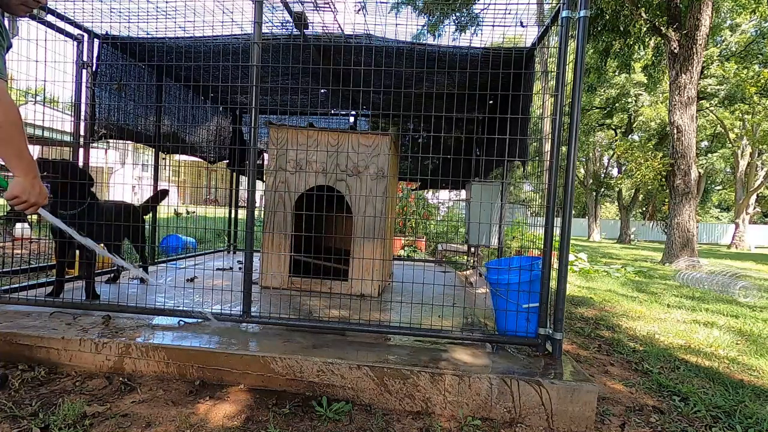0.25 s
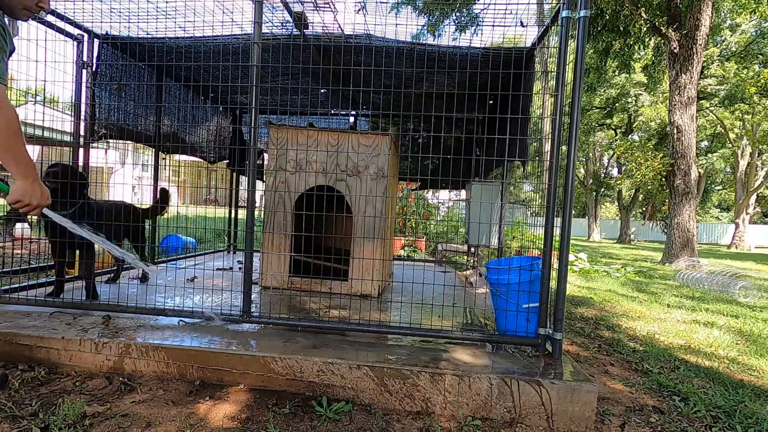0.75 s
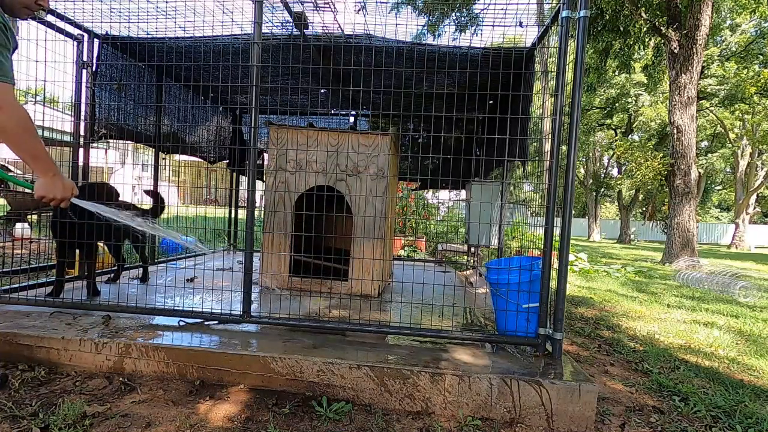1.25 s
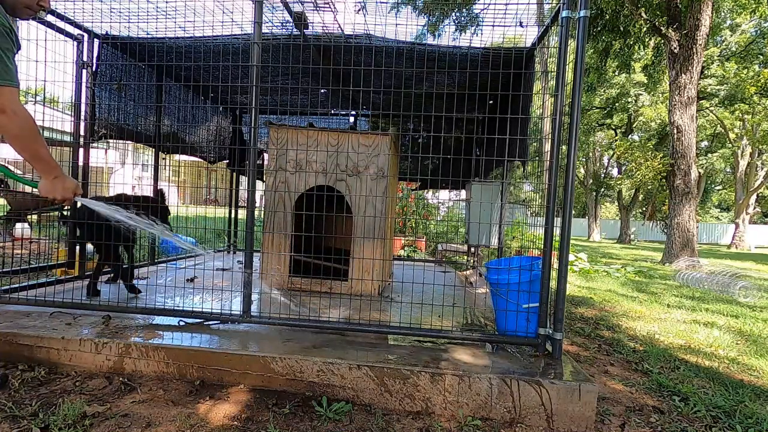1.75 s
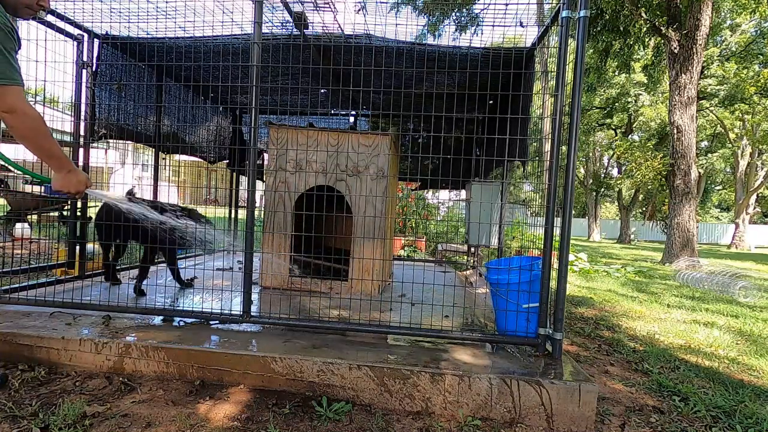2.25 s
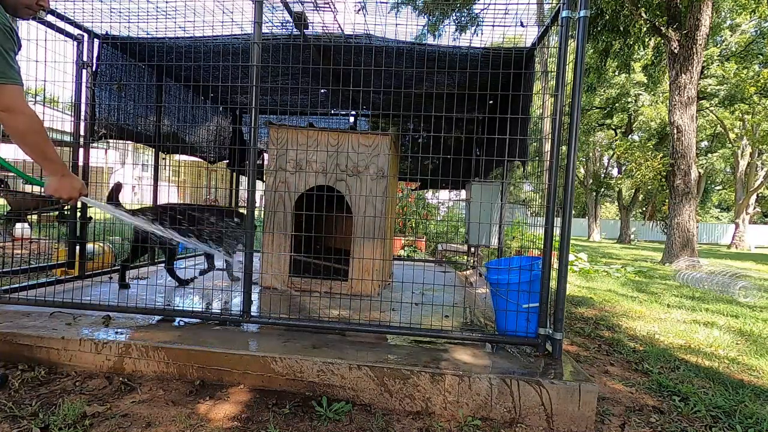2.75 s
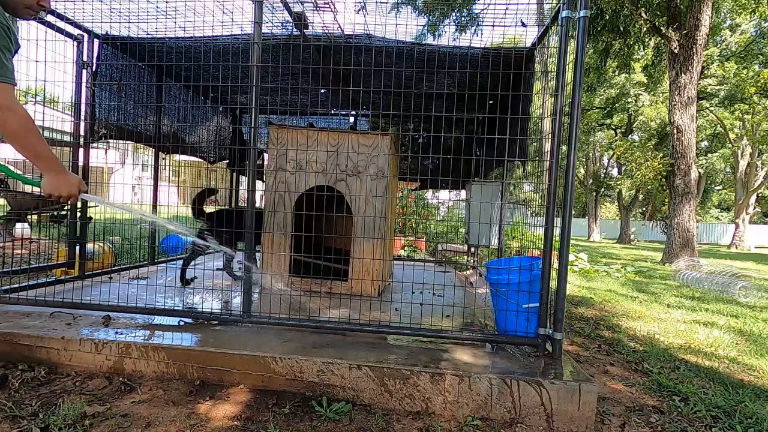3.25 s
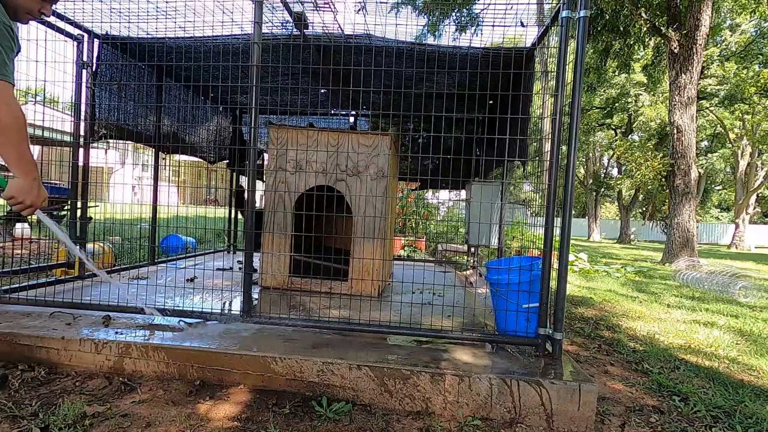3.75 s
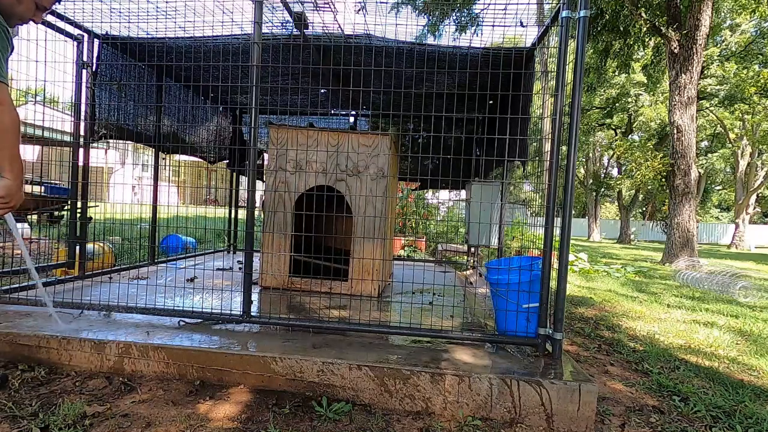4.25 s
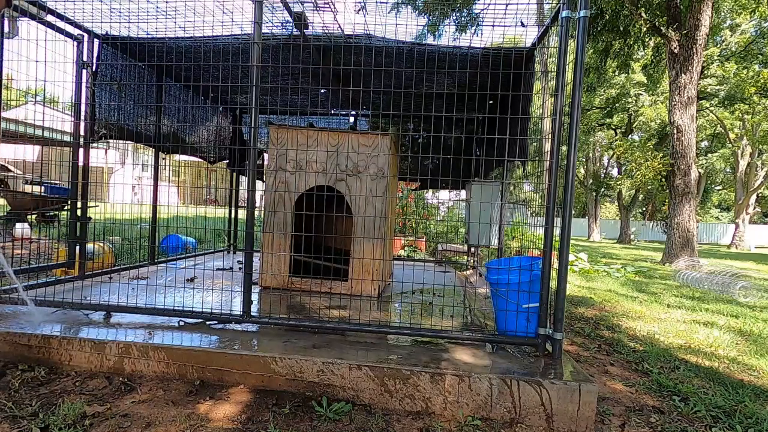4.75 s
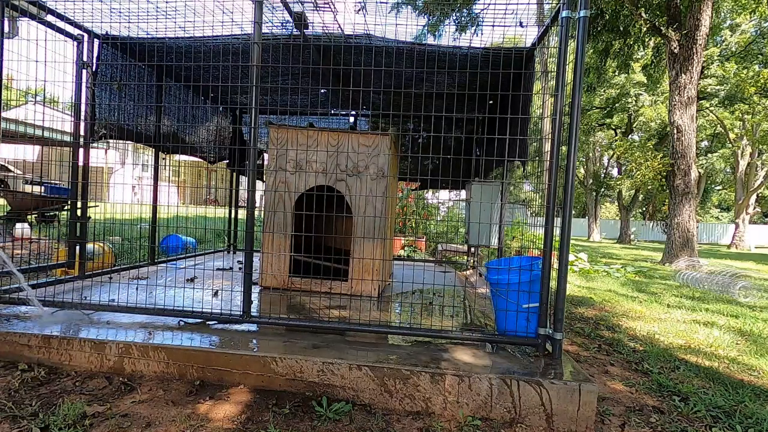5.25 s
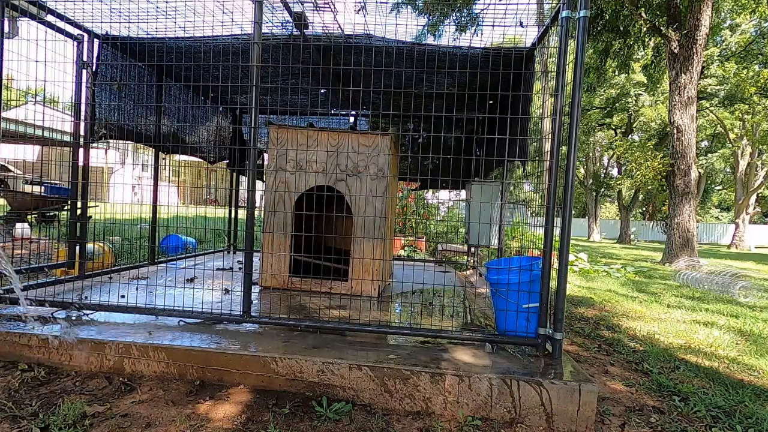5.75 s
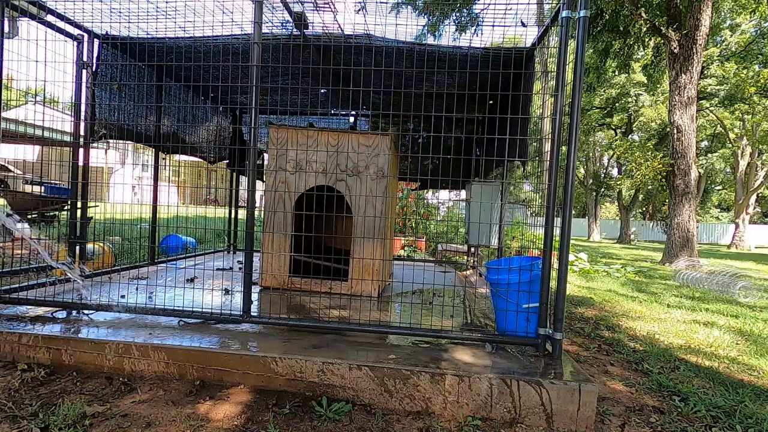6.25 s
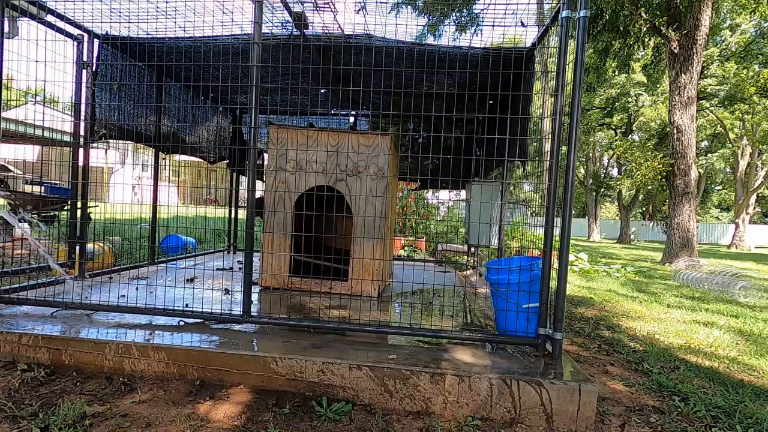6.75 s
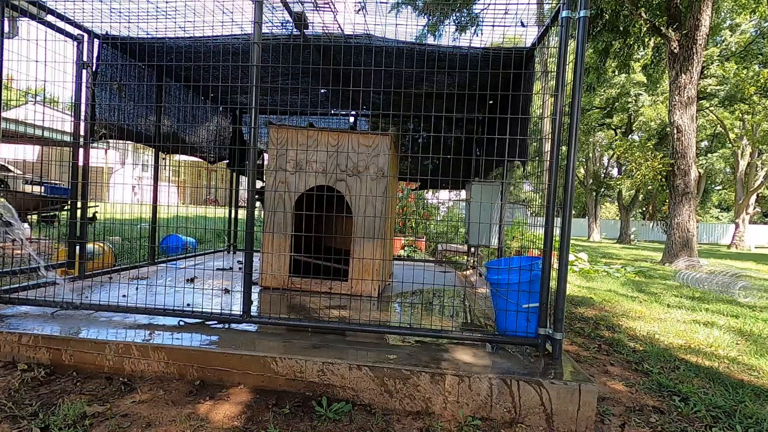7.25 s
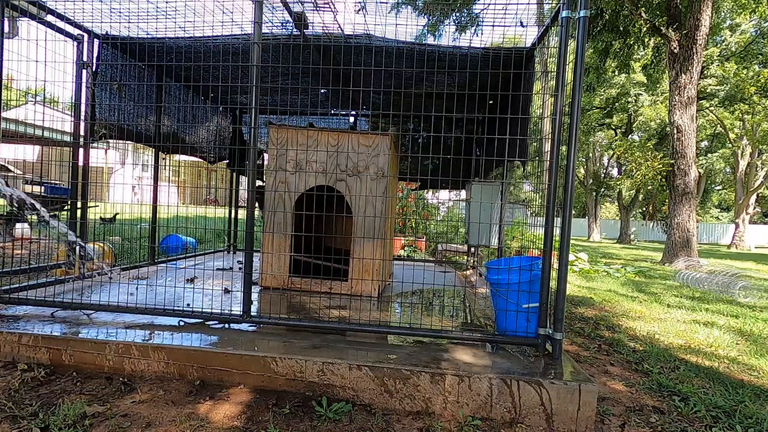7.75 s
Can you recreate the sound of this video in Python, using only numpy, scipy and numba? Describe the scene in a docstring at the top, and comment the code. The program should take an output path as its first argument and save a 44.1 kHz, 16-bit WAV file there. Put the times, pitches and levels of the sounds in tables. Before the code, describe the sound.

Water from a hose hisses and spatters across a concrete slab, shifting nearer and farther, finally dropping to sparse, plinking drips and slaps.

```python
"""Garden hose on concrete

A garden hose is swept over the wet concrete floor of an outdoor pen, a little left of the microphone.
Clumped random ticks are drops on the slab, damped sines are short-lived bubbles, filtered noise is mist.
Slugs of water slap singly (crack noise plus a ringing air pocket); thick lumps splat as dull noise bursts.
Behind lie a low rumble of shaped noise and a faint two-tone machine hum."""
import sys
import numpy as np
from scipy import signal
from scipy.fft import rfft, irfft
from scipy.io import wavfile
from scipy.ndimage import uniform_filter1d, map_coordinates
from numba import njit

SR = 44100
rng = np.random.default_rng(int(sys.argv[2]) if len(sys.argv) > 2 else 0)


def to_wav(s):
    """Save 16-bit WAV."""
    ch = np.atleast_2d(s).T  # columns
    pcm = np.round(np.clip(ch, -1, 1) * 32767)  # PCM
    wavfile.write(sys.argv[1], SR, pcm.astype(np.int16))


N = 352888
TIME_S = np.arange(N) / SR
FREQS_HZ = np.maximum(np.fft.rfftfreq(N, 1 / SR), 1)
SIDES = np.array([[1], [-1]])  # left, right

# Levels are nominal, ahead of panning, echo and port colour.
# Jet landing near, far, near again, then aside. Each row: time in seconds, level in dB.
LANDING = [(0, -33.5), (.3, -34), (.37, -31), (.92, -31.5), (.96, -38.5), (1.45, -37.5), (1.65, -37),
           (2.1, -37), (2.85, -38.5), (3.33, -35.5), (3.52, -39), (3.85, -33.5), (5.65, -34), (5.82, -35.5),
           (5.89, -50), (6.27, -43), (6.285, -41.5), (7.25, -41), (7.7, -43), (8, -36.5)]
# Where the jet lands. Each row: time in seconds, low splash in dB and fine spray in dB (both relative
# to the middle band), left minus right in dB.
AIM = [(0, -11, 0.5, 4.5), (.8, -12.5, 0.3, 5), (1, -10, -1.5, 4), (2.3, -7, -1.5, 3.5), (2.8, -9.5, -5, 4),
       (3.05, -7.5, 3.2, 3.5), (3.35, -7.5, 1.5, 3.5), (3.65, -12, -5.5, 3.5), (3.9, -13.5, 0.9, 4.5),
       (4.3, -14.5, 2, 5.5), (5.15, -15, 2.1, 5.5), (5.7, -15, 3.5, 6), (6.4, -11.5, -1.7, 6),
       (7.7, -17, 1.5, 7), (8, -8.5, 0, 5)]
# Break-up of the stream into drops. Each row: time in seconds, spatter over mist in dB.
BREAKUP = [(0, -1.5), (.9, -0.5), (1.2, -3), (3.6, -1.5), (4, -2), (5.5, 0.5), (6, 2.5), (8, 4)]
# Brief level changes in the stream, mostly swells, a few dips. Each row: centre in seconds, change in dB.
LEVEL_CHANGES = [(.91, 1.5), (1.01, 2.5), (1.22, 3.5), (1.77, 3), (1.91, 0.5), (2.44, 3), (2.63, -1),
                 (2.77, 2), (2.93, 3.5), (3.04, 4.5), (3.27, 2.5), (3.885, 6.5), (5.957, 8.5), (6.292, -3),
                 (6.345, 6.5), (6.57, 1), (7.15, 2), (7.25, 4)]
# Gaps, the stream briefly missing the slab. Each row: centre in seconds, level change in dB.
GAPS = [(.105, -7.5), (.135, -8.5), (.29, -6), (2, -2.5), (2.33, -3.5), (2.85, -5.5), (3.18, -6.5)]
# Splash colour. Each row: frequency in Hz, relative gain in dB.
SPLASH_COLOUR = [(200, -10), (500, -18), (800, -18.5), (1050, -9.5), (1600, -6), (2400, -3.5), (4200, -1),
                 (5600, 0.5), (6800, -1.5), (8600, -1.5), (9600, -8), (11000, -14.5), (12300, -17),
                 (15500, -32)]
# Nozzle hiss. Each row: time in seconds, level in dB.
NOZZLE = [(0, -53), (1, -57), (3.3, -51), (3.9, -64), (5.8, -64), (6, -73), (8, -77.5)]
# Rumble colour. Each row: frequency in Hz, relative gain in dB.
RUMBLE_COLOUR = [(8, -36), (22, 0), (32, 4), (50, -2), (66, -16), (110, -10.5), (160, -15.5), (220, -13),
                 (270, -23), (450, -30.5), (800, -34.5), (1100, -28.5)]
# Distant machine. Each row: frequency in Hz, mean level in dB.
HUM = [(58.5, -53.5), (239.8, -59)]
# Individually timed slaps on the wet slab, loud to faint. Each row: start in seconds, peak before
# band-limiting in dB, trapped-air pitch in Hz, crack share of the power in dB (0 or more: all crack).
TIMED_SLAPS = [(.0656, -17, 2660, -12), (.1562, -25, 4390, 0), (.3721, -11, 2160, 2),
               (.4222, -13, 3620, -10), (.4292, -13, 6040, 0), (1.01, -18.5, 3670, -4),
               (1.9056, -15, 3360, -4), (2.2, -14, 2350, -4), (2.3845, -16.5, 4930, 1),
               (2.7886, -15, 3470, -4), (3.029, -18, 4640, -6), (3.4672, -17.5, 2960, -1),
               (3.5604, -19.5, 5700, -9), (4.108, -18, 2400, -15), (4.3236, -15, 2820, -3),
               (4.608, -14.5, 2830, -2.5), (4.6456, -12.5, 5400, -6), (5.109, -12, 2770, -1.5),
               (5.211, -22, 2110, -13), (5.243, -16.5, 2800, -9), (5.259, -17, 2630, -16),
               (5.2924, -10.5, 6340, -13), (5.5772, -11.5, 5530, -5), (5.7635, -16.5, 2490, -1.5),
               (5.9346, -20, 5300, 0), (5.9665, -21, 3200, -2), (5.971, -10.5, 2720, -3.5),
               (6.0935, -23, 5900, -8), (6.1539, -15.5, 2540, -3), (6.2765, -14, 2950, -2),
               (6.2846, -22, 3100, -5), (6.2993, -12, 4950, 1), (6.3095, -16, 6040, -3),
               (6.3424, -18, 2860, -5), (6.3994, -16, 2540, 0), (6.4306, -18.5, 2540, -1),
               (6.5509, -20, 2700, -5), (6.575, -15, 2970, 0), (6.6493, -18, 2400, 0),
               (6.7084, -20.5, 4360, 0), (6.8788, -17.5, 6160, -2.5), (6.9345, -18, 2240, -5),
               (7.0002, -11.5, 4700, -6), (7.135, -19, 2460, -18), (7.1586, -14.5, 2780, -1.5),
               (7.2484, -14.5, 4530, -1.5), (7.448, -19, 3920, -1), (7.561, -16.5, 4630, -7),
               (7.676, -17, 2850, -2.5), (7.694, -16.5, 4900, -1.5), (7.7473, -18, 4430, -3),
               (7.772, -19, 4000, -5)]
# Thick lumps of water. Each row: start in seconds, peak in dB, nominal centre in Hz.
SPLATS = [(.464, -20, 1940), (0.653, -25, 1670), (2.435, -30, 1700), (2.768, -24.5, 1890),
          (3.864, -38.5, 620), (5.97, -38, 970), (7.582, -33, 1250)]
# Difference between the microphone ports. Each row: frequency in Hz, left minus right in dB.
PORTS = [(500, -4), (1300, -4), (2400, -0.5), (4400, -0.5), (8100, -4.5), (12000, -8.5), (15000, -7)]

CHANGE_SIGMA_S, GAP_SIGMA_S = 0.016, 0.014
FLUTTER_HZ, FLUTTER_RMS_DB = 11.5, 1.0  # unevenness of the stream
RUMBLE_DB, BASS_DB = -45.5, -46.5  # gain above and below 88 Hz
GUST_RMS_DB, GUST_HZ = 3, 8.1  # swelling of the bass
RANDOM_SLAPS_PER_S, RANDOM_CRACK_DB = 16, -9
RANDOM_SLAP_DB, RANDOM_SPREAD_DB = -24.5, 6  # mean peak, scatter either way
RANDOM_FOLLOW = 0.4  # dB of change per dB of flow
POCKET_LOW_HZ, POCKET_HIGH_HZ = 2390, 6300
TOP_HZ = 15750


def undb(db):
    """Decibels to gain."""
    return 10 ** (np.asarray(db) / 20)


def unit(x):
    """Scale to rms 1."""
    return x / np.sqrt(np.mean(x ** 2))


def curves(table):
    """Interpolate each column of a timed table to every sample."""
    time_s, *columns = np.transpose(table)
    return [np.interp(TIME_S, time_s, c) for c in columns]


def response(points):
    """Gain at every frequency from (Hz, dB) points, on a log frequency axis."""
    hz, db = np.transpose(points)
    return undb(np.interp(np.log(FREQS_HZ), np.log(hz), db))


def shape(x, gain):
    """Filter by a gain per frequency."""
    return irfft(rfft(x) * gain, N)


def below(edge_hz, order=6):
    """Low-pass gain; one minus it is the matching high-pass."""
    return 1 / (1 + (FREQS_HZ / edge_hz) ** order)


def walk(rate_hz):
    """Random wander of rms 1, low-passed around rate_hz."""
    return unit(shape(rng.standard_normal(N), below(rate_hz, order=2)))


def flow_level_db():
    """Landing level: follows the landing curve, with brief swells, dips and gaps, and flutters."""
    level_db = curves(LANDING)[0]
    for table, sigma_s in ((LEVEL_CHANGES, CHANGE_SIGMA_S), (GAPS, GAP_SIGMA_S)):
        for centre_s, change_db in table:
            level_db = level_db + change_db * np.exp(-.5 * ((TIME_S - centre_s) / sigma_s) ** 2)
    return level_db + FLUTTER_RMS_DB * walk(FLUTTER_HZ)


def drops(per_s, spread_db, scatter):
    """Drops tick as single-sample impulses, scattered left and right of the landing point."""
    hit, size, lean = rng.random(N), rng.standard_normal(N), rng.standard_normal(N)
    gain = undb(spread_db * np.minimum(size, 2))
    ticks = (hit < per_s / SR) * gain * rng.choice([-1, 1], N)
    return unit(ticks * (1 + scatter * SIDES * lean))


@njit
def rings(start, hz, cycles, size, lean):
    """Damped sines that fall by 1/e in so many cycles, each leaning left or right."""
    out = np.zeros((2, N))
    for k in range(len(start)):
        step = hz[k] / SR  # cycles per sample
        z, p = size[k] + 0j, np.exp(2j * np.pi * step - step / cycles[k])
        for i in range(start[k], min(N, start[k] + int(6 * cycles[k] / step))):
            z *= p
            out[0, i] += z.imag * (1 + lean[k])
            out[1, i] += z.imag * (1 - lean[k])
    return out


def bubbles(cycles, spread_db, scatter, low_hz, high_hz, count):
    """Air pockets in the water film ring for a few cycles, at random times and pitches."""
    when, pitch = rng.random((count, 2)).T
    size, life, lean = np.clip(rng.standard_normal((count, 3)).T, -2, 2)
    start = (when * N).astype(int)
    hz = low_hz + (high_hz - low_hz) * pitch
    gain = undb(spread_db * size) * np.sqrt(hz)
    return unit(rings(start, hz, cycles * np.exp(life / 2), gain, scatter * lean))


def clumps(spread_db, per_s, fall_s):
    """Lumps of many sizes land abruptly and their spatter power decays exponentially."""
    hit = rng.random(N) < per_s / SR
    size = undb(-spread_db * rng.random(N))
    power = signal.lfilter([1], [1, -np.exp(-1 / (fall_s * SR))], hit * size ** 2)
    power /= uniform_filter1d(power, size=1800) + 1e-9  # evens out the flow over 41 ms
    return unit(np.sqrt(np.maximum(power, 0)))


def jet(jet_db):
    """Clumped drops and bubbles over even mist; the aim balances low, middle and fine bands."""
    breakup_db, = curves(BREAKUP)
    low_db, fine_db, _ = curves(AIM)
    ticks = drops(per_s=10000, spread_db=3, scatter=.3)
    plinks = bubbles(cycles=2.4, spread_db=6.5, scatter=0.13, low_hz=952, high_hz=12550, count=30000)
    plops = bubbles(cycles=5.6, spread_db=2.5, scatter=0.17, low_hz=1700, high_hz=6410, count=1800)
    spatter = unit(ticks + undb(3) * plinks + undb(-5) * plops)
    spatter = spatter * clumps(spread_db=18, per_s=480, fall_s=.0015)
    mist = rng.standard_normal(N) + 0.69 * rng.standard_normal((2, N))  # shared plus per side
    mixed = (spatter * undb(breakup_db) + mist) / np.hypot(undb(breakup_db), 1)
    water = shape(mixed, response(SPLASH_COLOUR))
    under, over = below(1860), 1 - below(4630)
    low = unit(shape(water, under * (1 - below(230)))) * undb(low_db)
    middle = unit(shape(water, 1 - under - over))
    fine = unit(shape(water, over)) * undb(fine_db)
    total = np.sqrt(1 + undb(low_db) ** 2 + undb(fine_db) ** 2)
    return (low + middle + fine) / total * undb(jet_db)


def nozzle(flicker_rms_db):
    """The stream tears apart at the nozzle: high noise with a fast random flicker in level."""
    hiss_db, = curves(NOZZLE)
    hiss = rng.standard_normal(N) + 1.3 * rng.standard_normal((2, N))
    hiss = hiss * undb(flicker_rms_db * walk(370))
    colour = response([(6000, -27), (10000, 7.5), (12200, 0), (15500, -13)])
    return unit(shape(hiss, colour)) * undb(hiss_db)


def yard(width, left_minus_right_db):
    """Rumble of shaped noise with swelling bass, and hum of two slowly wandering sines."""
    air = rng.standard_normal(N) + width * SIDES * rng.standard_normal(N)
    air = shape(air, 1 - below(19, order=8))
    rumble = unit(shape(air, response(RUMBLE_COLOUR) * below(2360)))
    bass = shape(rumble, below(88))
    swell = undb(BASS_DB + GUST_RMS_DB * walk(GUST_HZ))
    rumble = bass * swell + (rumble - bass) * undb(RUMBLE_DB)
    hum = sum(undb(db + walk(0.37)) * np.sqrt(2) * np.sin(2 * np.pi * hz * TIME_S) for hz, db in HUM)
    return (rumble + hum) * undb(SIDES * left_minus_right_db / 2)


def slaps(rows, cycles, rebound_s, rebound, crack_s, spatter_s):
    """A slug cracks on the slab, its air pocket rings and rebounds once, and droplets spatter after."""
    out, t = np.zeros(N + 2048), np.arange(2048) / SR
    for start_s, db, hz, crack_db in rows:
        noise, spatter = rng.standard_normal((2, len(t)))
        late = np.maximum(t - rebound_s * rng.uniform(0.62, 1.277), 0)
        pocket = 0
        for gain, u in ((1, t), (rebound, late)):
            pocket = pocket + gain * np.sin(2 * np.pi * hz * u) * np.sqrt(u) * np.exp(-u * hz / cycles)
        # water is soft: the crack takes a moment to build
        crack = noise * np.sqrt(t / crack_s) * np.exp(-t / crack_s)
        # signed squaring makes the droplets spikier
        crack = crack + undb(-17.5) * unit(spatter * np.abs(spatter)) * np.exp(-t / spatter_s)
        crack = signal.lfilter(*signal.butter(1, [1700, 5800], "band", fs=SR), crack)
        share = min(undb(crack_db) ** 2, 1)
        slap = np.sqrt(1 - share) * unit(pocket) + np.sqrt(share) * unit(crack)
        start = int(start_s * SR)
        out[start:start + len(t)] += undb(db) * slap / np.abs(slap).max()
    return shape(out[:N], below(8800) * (1 - below(1380, order=3)))


def random_slaps(flow_db):
    """Further slugs at random times; they follow the flow only partly, so stand out where it is thin."""
    rows, level_db = [], RANDOM_SLAP_DB + RANDOM_FOLLOW * (flow_db - flow_db.mean())
    for when, size, pitch in rng.random((int(RANDOM_SLAPS_PER_S * N / SR), 3)):
        db = level_db[int(when * N)] + RANDOM_SPREAD_DB * (2 * size - 1)
        hz = POCKET_LOW_HZ * (POCKET_HIGH_HZ / POCKET_LOW_HZ) ** pitch
        rows.append((when * N / SR, db, hz, RANDOM_CRACK_DB))
    return rows


def splats(fall_s):
    """A thick lump lands as a dull, decaying burst of band-passed noise."""
    out, t = np.zeros(N + 2048), np.arange(2048) / SR
    for start_s, db, hz in SPLATS:
        burst = rng.standard_normal(len(t)) * np.exp(-t / fall_s)
        splat = signal.lfilter(*signal.butter(2, [hz / 1.47, hz * 1.55], "band", fs=SR), burst)
        start = int(start_s * SR)
        out[start:start + len(t)] += undb(db) * splat / np.abs(splat).max()
    return out[:N]


def smear(x, fall_s, size, count=64):
    """Surfaces near the moving landing point scatter sound: random decaying echoes, crossfaded in turn."""
    hop, t = N // count + 1, np.arange(size) / SR
    paths = rng.standard_normal((2, count + 1, size)) * np.exp(-t / fall_s)
    paths /= np.sqrt(np.sum(paths ** 2, axis=2, keepdims=True))
    padded = np.pad(x, [(0, 0), (hop, 2 * hop)])
    out = np.zeros((2, N + 3 * hop + size))
    fade = np.sqrt(np.hanning(2 * hop))
    for k in range(count + 1):
        piece = signal.fftconvolve(padded[:, k * hop:(k + 2) * hop] * fade, paths[:, k], axes=1)
        out[:, k * hop:k * hop + piece.shape[1]] += piece
    return out[:, hop:hop + N]


def pen(x, spray_db):
    """Kerb, fence and kennel give a short echo; fine spray noise follows the treble of the splashes."""
    echo = undb(-13) * smear(x, fall_s=.016, size=4096)
    treble = shape(x[0], 1 - below(9100))
    strength = np.sqrt(uniform_filter1d(treble ** 2, size=40).clip(0))
    colour = response([(7000, -11), (10500, -3.0), (12300, -6), (15500, -19)])
    spray = strength * unit(shape(rng.standard_normal((2, N)), colour))
    return x + echo + undb(spray_db) * spray


def ports(x):
    """Two ports differ in colour; water reaches the left one slightly later, more so before 3.4 s."""
    lag_s = np.interp(TIME_S, [3.4, 4], [.000022, .000006])
    body = shape(x[0], below(8900))  # only this part is delayed
    left = x[0] - body + map_coordinates(body, [(TIME_S - lag_s) * SR], order=3)
    return shape(np.array([left, x[1]]), response(PORTS) ** (SIDES / 2))


def scene():
    """The water, panned by its aim, in its pen and yard."""
    around = yard(width=0.27, left_minus_right_db=1.6)
    hiss = nozzle(flicker_rms_db=7.0)
    flow_db, pan_db = flow_level_db(), curves(AIM)[2]
    water = jet(flow_db) + splats(fall_s=0.0065)
    slugs = list(TIMED_SLAPS) + random_slaps(flow_db)
    water = water + slaps(slugs, cycles=1.38, rebound_s=0.001794, rebound=0.18,
                          crack_s=0.00064, spatter_s=0.017)
    water = pen(water, spray_db=-2.5) + hiss
    return ports(water * undb(SIDES * pan_db / 2)) + around


def record(dry):
    """The recorder cuts the top with a steep elliptic low-pass."""
    return signal.sosfilt(signal.ellip(10, .2, 80, TOP_HZ, fs=SR, output="sos"), dry)


dry = scene()
out = record(dry)
to_wav(out)
```